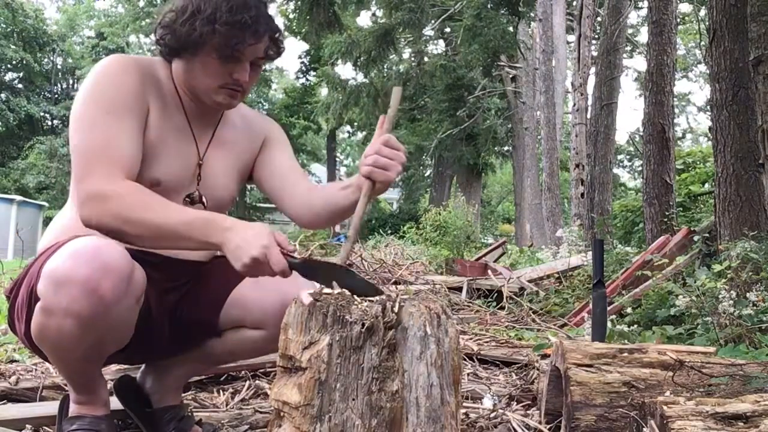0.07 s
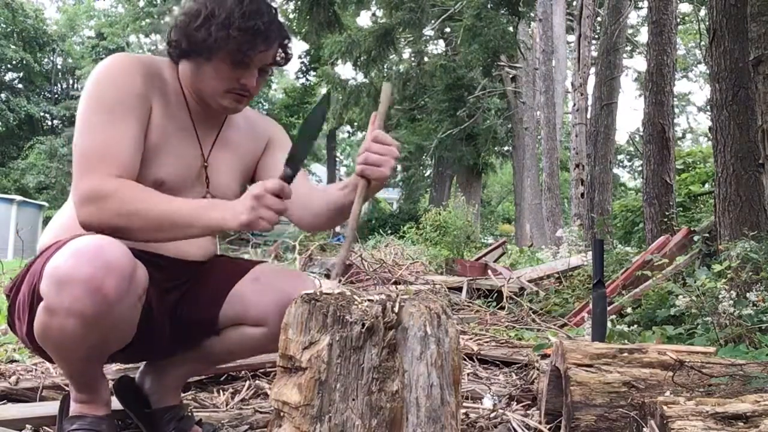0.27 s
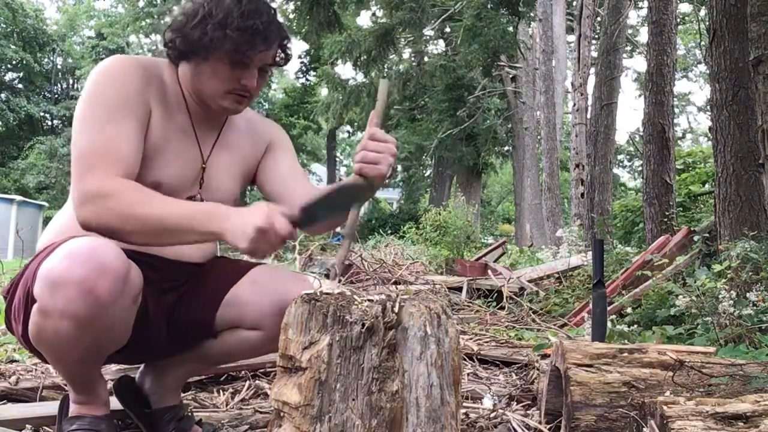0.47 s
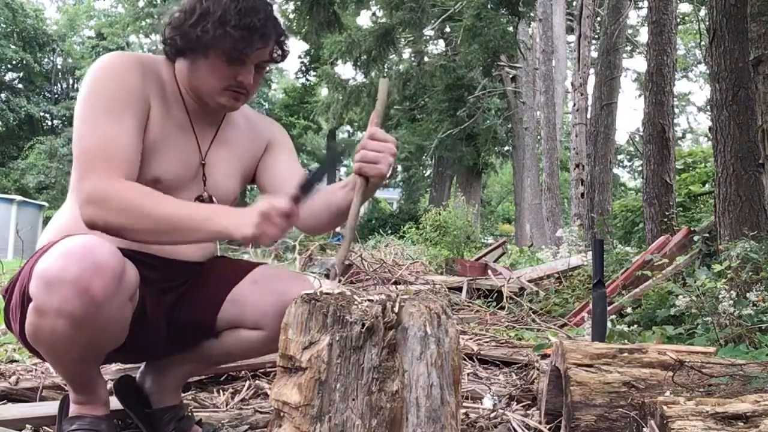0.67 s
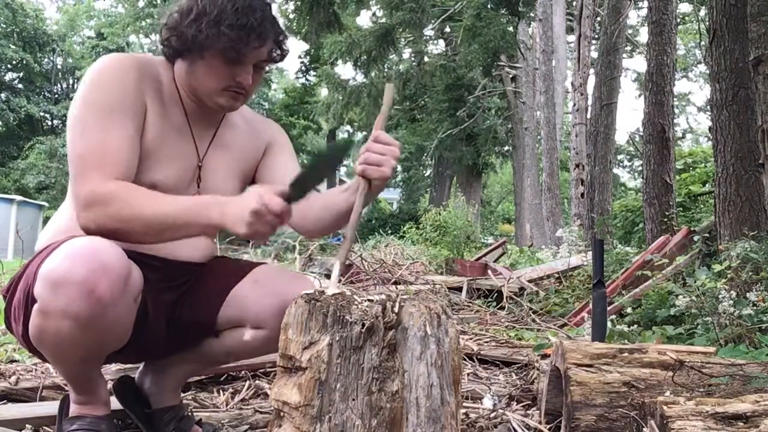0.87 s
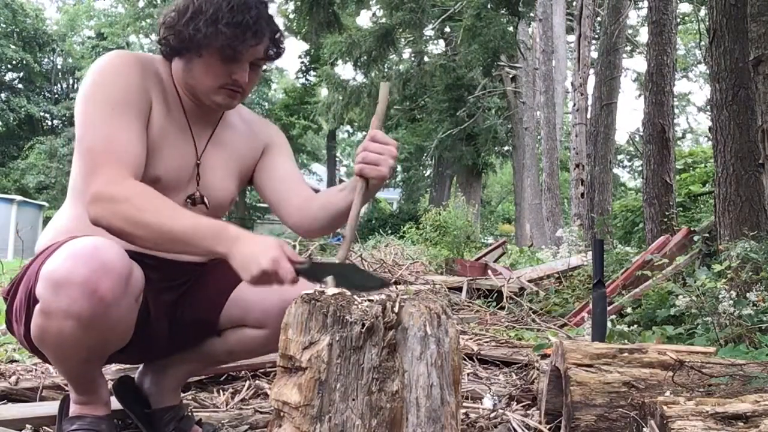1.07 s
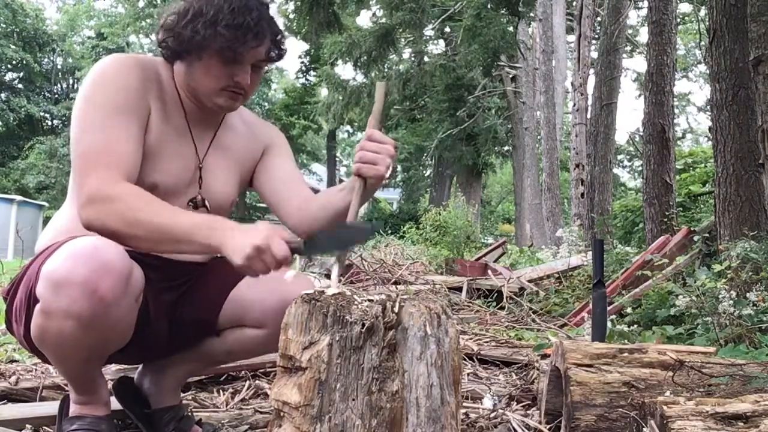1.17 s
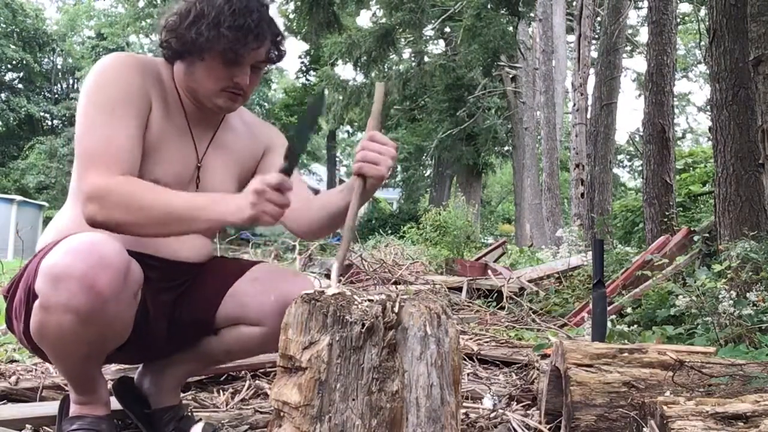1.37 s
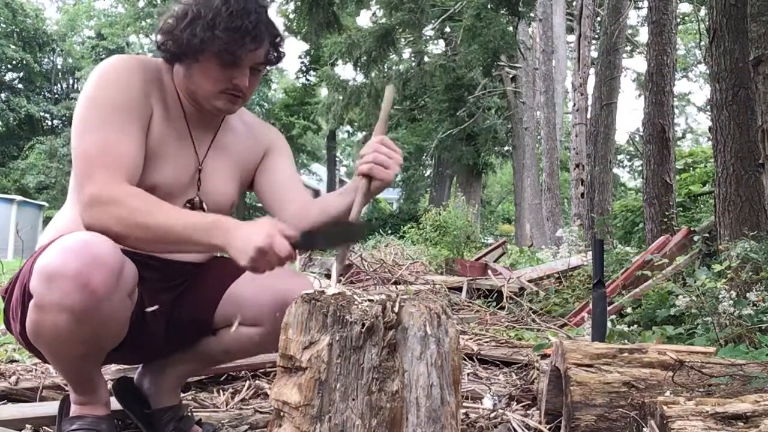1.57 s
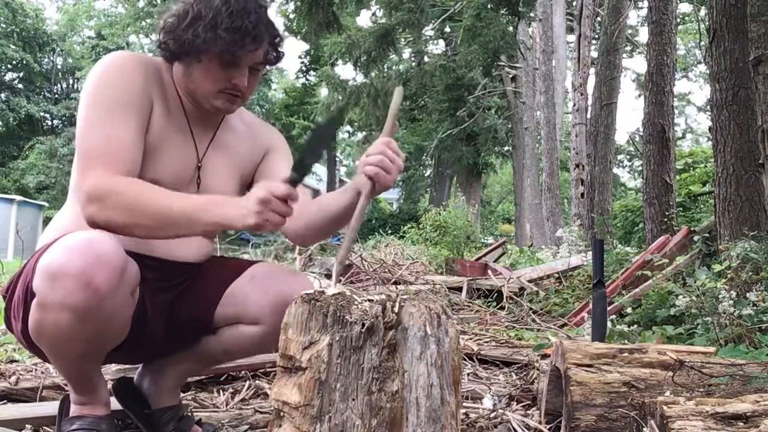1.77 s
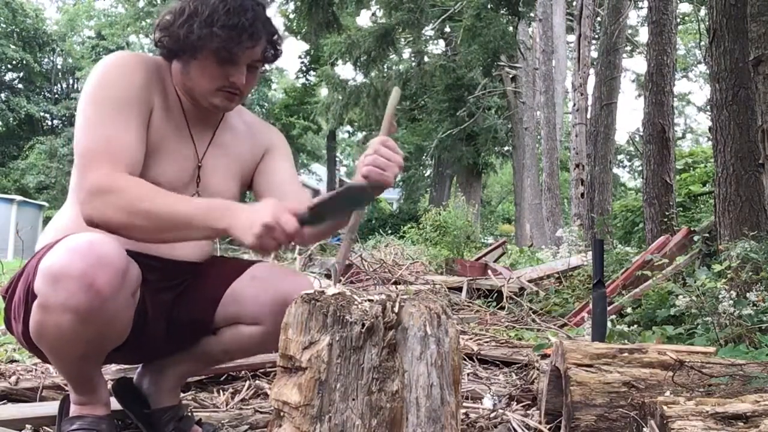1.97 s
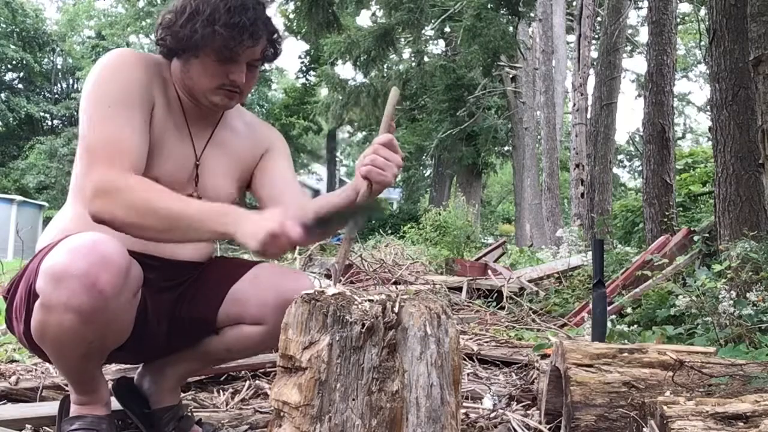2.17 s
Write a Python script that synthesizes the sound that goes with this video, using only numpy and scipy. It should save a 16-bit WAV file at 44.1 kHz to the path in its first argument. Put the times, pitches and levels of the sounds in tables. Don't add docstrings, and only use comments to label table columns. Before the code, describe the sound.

A knife chops a green stick on a stump. A deep woody knock is already landing at 0 s; further chops come near 0.37, 0.73, 1.08, 1.46 and 1.85 s. Each is a sharp fibrous crunch with brief steel ring, knock and soft low ground thump; those at 0.37 and 1.85 knock faintly but ring brightly. Tiny chips tick between. Faint insects, leaves, distant traffic; one far bird near 1.8 s.

```python
import sys
import numpy as np
from scipy import signal
from scipy.io import wavfile
from scipy.ndimage import uniform_filter1d

SR = 44100
rng = np.random.default_rng(int(sys.argv[2]) if len(sys.argv) > 2 else 0)


def transcribe(u):
    v = np.clip(np.atleast_2d(u).T, -1, 1)
    q = np.round(v * 32767).astype(np.int16)
    wavfile.write(sys.argv[1], SR, q)


def field_ratio(decibels):
    return 10 ** (np.asarray(decibels, dtype=float) / 20)


N = 97108
LEAD = 2048

# (frequency [Hz], level per Hz [dB])
WASH_SPECTRUM = [(20, -1.5), (70, -3.5), (250, -19.5), (1200, -26.5), (5500, -28), (8200, -33.5),
                 (9300, -48), (15600, -44)]
WASH_DB, WASH_TOP_HZ, WASH_ABOVE_DB = -47, 15800, -25
HUM_HZ, HUM_WIDTH_HZ, HUM_DB = 1776, 460, -58.5
# (frequency [Hz], width [Hz], level [dB], throb depth [0-1])
INSECT_BANDS = [(6600, 700, -56, 0.63), (8130, 240, -72.5, .3), (4500, 620, -70, .3)]
THROBS_PER_S = 39.5
# (time [s], frequency [Hz], level [dB])
BIRD_NOTE = [
    (1.62, 1330, -67),
    (1.68, 1350, -65),
    (1.79, 1400, -53),
    (1.86, 1340, -75),
]
# (frequency [Hz], t60 [s])
TREE_DECAY = [(200, 0.098), (1000, 0.076), (4000, 0.18), (9000, 0.18), (15000, 0.11)]
TREES_DB, GROUND_BOUNCE_S, GROUND_BOUNCE_DB = -17.5, .0021, -20

GROUND_HZ, GROUND_PEAK_S, GROUND_RISE_S, GROUND_FALL_S = 53.8, 0.0722, 0.037, 0.02
GROUND_ECHO_S, GROUND_ECHO_DB, GROUND_ECHO_HZ, GROUND_ECHO_T60 = .135, -8, 54, 0.21
# (time [s], level [dB], frequency [Hz])
CHIP_TICKS = [(.296, -54, 12000), (0.304, -52, 14000), (0.307, -53, 11500), (0.7523, -44, 9000),
              (1.025, -52, 12500), (1.040, -46, 13500), (1.049, -48, 12000), (1.0513, -57.5, 13000),
              (1.449, -50, 13000), (1.451, -41, 3000), (1.53, -58, 13500), (1.642, -52, 12000),
              (1.815, -54, 12500)]
# (time [s], level [dB], frequency [Hz])
SPLINTERS = [(0.3687, -22, 11000), (.3732, -23, 4800), (.7248, -31, 12000), (.7398, -29, 4500),
             (0.745, -32, 4500), (1.0813, -16, 11300), (1.468, -25.5, 11000), (1.8515, -27, 12000)]

# (time [s], knock [dB], sharpness [dB], ground wave [dB])
LANDINGS = [
    (-.019, -5.5, -17, -32),
    (.374, -28, -3, -32.5),
    (.7382, -10, 1.5, -35),
    (1.0842, -13.5, -7, -30.5),
    (1.4681, -11, 1.5, -33),
    (1.853, -31, -1, -32.5),
]
# (frequency [Hz], level [dB], thud lag [s], ring length [factor])
CRACKS = [(702, 1, 0.00199, 1.14), (825, -1, 0.00385, 1.23), (2462, -2.5, 0.00443, 1.04),
          (670, -4, 0.0012, 1.77), (910, 2, .004, 0.86), (729.6, 3.5, 0.00416, 1.5)]
# (time after landing [s], level [dB])
BOUNCES = [
    (0, -1.5),
    (.0013, 4.5),
    (.0031, 0),
    (.0044, -2),
]
# (frequency [Hz], level [dB], t60 [s])
SNAP_MODES = [(780, -17, 0.023), (1006, -12.5, 0.017), (1320, -6, 0.01), (1618, -1, 0.03),
              (1790, -9, 0.013), (2900, -10.5, .012), (4580, -15, .012)]
# (frequency [Hz], level [dB], t60 [s])
STUMP_MODES = [(154, -12, 0.045), (252.3, -4, 0.03), (376, -11.5, .035), (393.8, 3, 0.032),
               (560, -14, 0.035), (706, -1, 0.033)]
PUSH_S, THUD_S = .00006, .00035
CRACK_T60, CHATTER_DB, KNOCK_LOW_CUT_HZ = 0.022, -13.5, 140

# (time [s], length [s], fade over the stroke [dB], rise [s], steel ring [dB])
CUTS = [
    (-.024, 0.015, -8.5, 0.0015, -14),
    (0.369, 0.0092, -8.5, 0.00067, -2.5),
    (0.7227, 0.019, -13, 0.00036, -11),
    (1.077, 0.0082, -4.5, 0.0053, -9),
    (1.4594, 0.0091, 1.5, .001, -22),
    (1.849, .010, -9, 0.00083, -3),
]
# (stick [Hz], stick [dB], edge squeal [Hz], squeal [dB], bare crackle [dB])
CUT_COLOURS = [(1650, -2, 4400, -4.5, 6.5), (1582, 9, 4830, -4, 0), (1560, 7.5, 5000, -0.5, -9),
               (1560, -3, 5220, 4, 2), (1616, -2.5, 5150, -4.5, -9.5), (1960, 2.5, 4160, -6, -1.5)]
# (ratio to its pitch [1], level [dB], t60 [s])
STICK_MODES = [(.53, -4.5, .015), (1, -24, 0.063), (1.2, -2, .015), (1.36, -3.5, 0.011),
               (1.57, -8.5, 0.014), (1.95, -9.5, .015), (2.7, -6, .02)]
# (frequency [Hz], level [dB], t60 [s])
STEEL_MODES = [(3017, -1.5, 0.089), (3786, -9.5, 0.078), (4360, -16, 0.029), (5130, -13, 0.024),
               (5440, -21, 0.028), (7030, -9, 0.027), (9020, -10.5, 0.055), (10500, -13, 0.036),
               (11560, -22, 0.031), (13500, -23, .025)]
# (frequency [Hz], level per Hz [dB])
FIBRE_SPECTRUM = [(120, -32), (200, -15.5), (1670, 7), (3430, -5), (5250, -6.5), (7740, -11), (15000, -4.5),
                  (16500, -54)]
FIBRES_PER_S, FIBRE_SPREAD_DB, LET_GO_T60 = 14000, 4, 0.027
STEEL_SPREAD_DB, SQUEAL_WIDTH_HZ = 3.7, 420
ENTRY_S, ENTRY_FLOOR, BITE_DB = 0.0013, 0.57, 13
CUT_DB, CUT_LOW_CUT_HZ = -21.5, 290


def evened(x):
    return x / np.sqrt(np.mean(x ** 2) + 1e-20)


def read(points, hz):
    f, value = np.transpose(points)
    return np.interp(np.log(hz + 1), np.log(f + 1), value)


def add(mix, s, sound):
    part = mix[LEAD + round(s * SR):][:len(sound)]
    part += sound[:len(part)]


def low_cut(x, hz):
    return signal.sosfilt(signal.butter(2, hz, "high", fs=SR, output="sos"), x)


def resonate(x, hz, width):
    turn = np.exp(2j * np.pi * np.cumsum(hz * np.ones(len(x))) / SR)
    r = np.exp(-np.pi * width / SR)
    return 2 * (turn * signal.lfilter([1 - r], [1, -r], x / turn + 1e-18)).real


def ring(modes, detune):
    t = np.arange(6000) / SR
    out = 0
    for (hz, db, t60), d in zip(modes, detune):
        out = out + field_ratio(db - 60 * t / t60) * np.sin(2 * np.pi * hz * d * t)
    return out / np.linalg.norm(out)


def colour(points):
    log_gain = np.log(field_ratio(read(points, abs(np.fft.fftfreq(2048, 1 / SR)))))
    phase = -signal.hilbert(log_gain).imag
    taps = np.fft.ifft(np.exp(log_gain + 1j * phase)).real[:1024]
    return taps / np.linalg.norm(taps)


def bump(width):
    u = np.arange(-3 * width, 3 * width, 1 / SR) / width
    return np.exp(-u * u) / np.exp(-u * u).sum()


def wash():
    frames, hz = N // 256 + 5, np.fft.rfftfreq(1024, 1 / SR)
    a, b, patches = rng.standard_normal((frames, 513, 3)).T
    patches = evened(uniform_filter1d(uniform_filter1d(patches, 12, 0), 14, 1))
    level = read(WASH_SPECTRUM, hz) + WASH_ABOVE_DB * (hz > WASH_TOP_HZ)
    z = (a + 1j * b) * field_ratio(level[:, None] + 1.37 * patches)
    return field_ratio(WASH_DB) * evened(signal.istft(z, nperseg=1024, noverlap=768)[1][:N])


def hum():
    return field_ratio(HUM_DB) * evened(resonate(rng.standard_normal(N), HUM_HZ, HUM_WIDTH_HZ))


def insects():
    out = np.zeros(N)
    for hz, width, db, depth in INSECT_BANDS:
        noise, wander, drift = rng.standard_normal((3, N))
        rate = THROBS_PER_S * (1 + .03 * evened(uniform_filter1d(wander, 3000)))
        turns = np.cumsum(rate) / SR
        throb = 1 - depth * (1 - np.exp(-(turns % 1) / 0.26))
        swell = field_ratio(0.5 * evened(uniform_filter1d(uniform_filter1d(drift, 2000), 2000)))
        band = resonate(resonate(noise * throb * swell, hz, width), hz, 1.1 * width)
        out += field_ratio(db) * evened(band)
    return out


def bird():
    s, hz, db = np.transpose(BIRD_NOTE)
    t = np.arange(N) / SR
    glide = np.interp(t, s, hz)
    note = evened(resonate(resonate(rng.standard_normal(N), glide, 87.4), glide, 120))
    return field_ratio(np.interp(t, s, db, -120, -120)) * note


def trees(x):
    taps = np.zeros(SR // 2)
    at = np.arange(120, len(taps) - 20, 20)
    taps[at + rng.integers(0, 20, len(at))] = rng.choice([-1., 1.], len(at))
    hz, t, z = signal.stft(taps, SR, nperseg=128)
    tail = signal.istft(z * field_ratio(-60 * t / read(TREE_DECAY, hz)[:, None]), SR, nperseg=128)[1]
    tail = field_ratio(TREES_DB) * tail / np.linalg.norm(tail)
    tail[round(GROUND_BOUNCE_S * SR)] += field_ratio(GROUND_BOUNCE_DB)
    return signal.fftconvolve(x, tail)[:len(x)]


def ground(level_db):
    t = np.arange(20000) / SR
    s = t - GROUND_PEAK_S
    packet = np.exp(-(s / np.where(s < 0, GROUND_RISE_S, GROUND_FALL_S)) ** 2 / 2)
    main = packet * np.cos(2 * np.pi * GROUND_HZ * s)
    r = t - GROUND_ECHO_S
    decay = field_ratio(GROUND_ECHO_DB - 60 * np.maximum(r, 0) / GROUND_ECHO_T60)
    back = np.clip(1 + r / 0.038, 0, 1) * decay * np.cos(2 * np.pi * GROUND_ECHO_HZ * r)
    return field_ratio(level_db) * np.minimum(t / 0.015, 1) * (main + back)


def tick(level_db, hz):
    t = np.arange(200) / SR
    crackle = rng.standard_normal(200) * np.exp(-t / 0.00052)
    return field_ratio(level_db) * 3 * resonate(crackle, hz, 0.63 * hz)


def knock(level_db, sharp_db, crack_hz, crack_db, lag, linger):
    push = np.zeros(400)
    size = rng.uniform(0.49, 1.9, 8)
    for k, (s, db) in enumerate(BOUNCES):
        push[round(s * SR)] += size[k] * field_ratio(db) * (-1) ** k
    detune = 1 + 0.01 * rng.standard_normal(10)
    bright = field_ratio(sharp_db) * ring(SNAP_MODES, detune)
    bright += field_ratio(crack_db) * ring([(crack_hz, 0, CRACK_T60)], [1])
    chatter = signal.fftconvolve(np.convolve(push, bump(PUSH_S)), bright)[:6000]
    stump = ring([(hz, db, t60 * linger) for hz, db, t60 in STUMP_MODES], 1 + (detune - 1) / 2)
    late_push = np.r_[np.zeros(round(lag * SR)), bump(THUD_S)]
    thud = np.convolve(late_push, stump)[:6000]
    return field_ratio(level_db + 22.5) * low_cut(field_ratio(CHATTER_DB) * chatter + thud, KNOCK_LOW_CUT_HZ)


def cut(length, sag_db, rise, steel_db, stick_hz, stick_db, squeal_hz, squeal_db, bare_db):
    t = np.arange(3000) / SR
    u, e, sign = rng.random((3, 3000))
    snap_size = field_ratio(-FIBRE_SPREAD_DB * np.log(e + 0.03))
    snaps = evened((u < FIBRES_PER_S / SR) * snap_size * np.sign(sign - .5))
    fade_db = sag_db * np.minimum(t / length, 1) - 60 * np.maximum(t - length, 0) / LET_GO_T60
    tearing = snaps * np.minimum(t / rise, 1) * field_ratio(fade_db)

    entry = 0.33 * tearing * (ENTRY_FLOOR + 1.9 * np.exp(-t / ENTRY_S))
    entry[round(rise * SR / 2)] += field_ratio(BITE_DB)
    d, grip = rng.standard_normal((2, 12))
    steel = [(hz, db + STEEL_SPREAD_DB * g, t60) for (hz, db, t60), g in zip(STEEL_MODES, grip)]
    struck = field_ratio(stick_db) * ring(STICK_MODES, stick_hz * (1 + .02 * d))
    struck += field_ratio(steel_db + 9.5) * ring(steel, 1 + 0.001 * d)

    scraped = field_ratio(squeal_db) * ring([(squeal_hz, 0, 1.7 / SQUEAL_WIDTH_HZ)], [1])
    scraped[:1024] += field_ratio(bare_db) * colour(FIBRE_SPECTRUM)
    sound = signal.fftconvolve(entry, struck) + signal.fftconvolve(tearing, scraped)
    return low_cut(field_ratio(CUT_DB) * sound, CUT_LOW_CUT_HZ)


def scene():
    chops, soil = np.zeros((2, N + LEAD))
    for (s, *stroke), tone in zip(CUTS, CUT_COLOURS):
        add(chops, s, cut(*stroke, *tone))
    for (s, db, sharp_db, ground_db), crack in zip(LANDINGS, CRACKS):
        add(chops, s, knock(db, sharp_db, *crack))
        add(soil, s, ground(ground_db))
    for s, db, hz in CHIP_TICKS + SPLINTERS:
        add(chops, s, tick(db, hz))
    near = (chops + trees(chops) + soil)[LEAD:]
    return (near + wash() + hum() + insects() + bird())[None]


def roll_off(x):
    return signal.sosfilt(signal.butter(12, 16810, fs=SR, output="sos"), x)


def record(dry):
    taps = signal.firwin(255, 15850, window=("kaiser", 5), fs=SR)
    mix = signal.oaconvolve(dry, taps[None], "same")
    return roll_off(mix)


dry = scene()
out = record(dry)
transcribe(out)
```